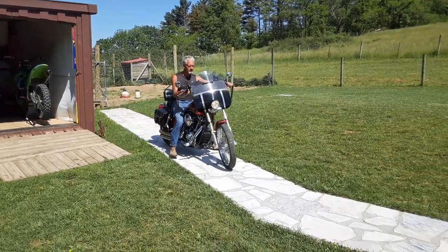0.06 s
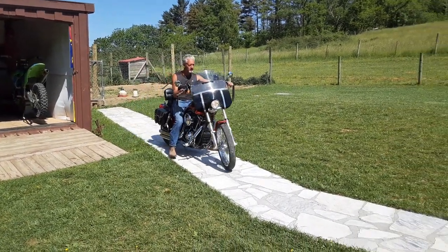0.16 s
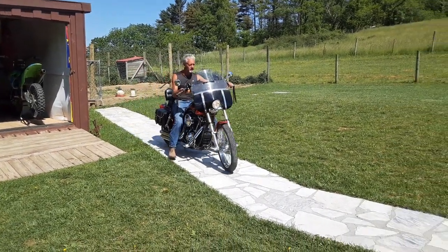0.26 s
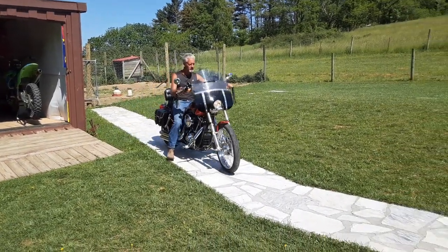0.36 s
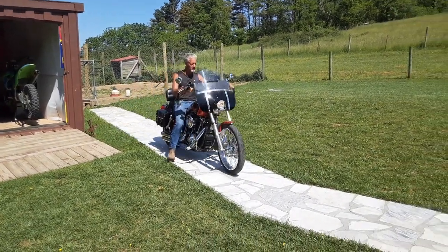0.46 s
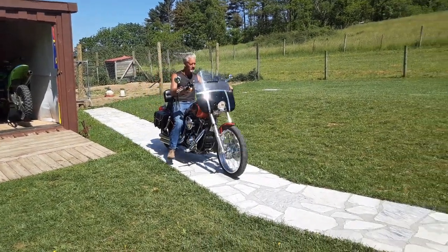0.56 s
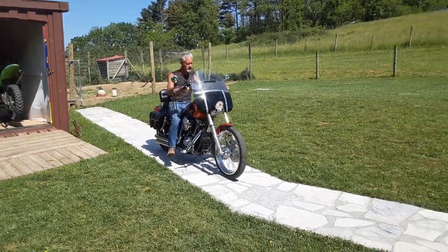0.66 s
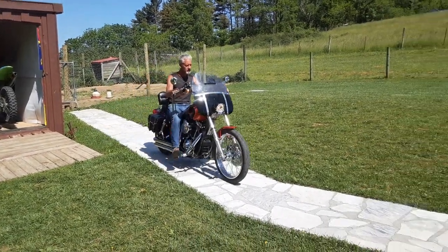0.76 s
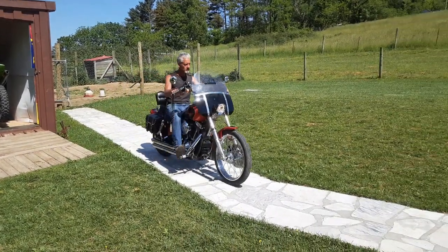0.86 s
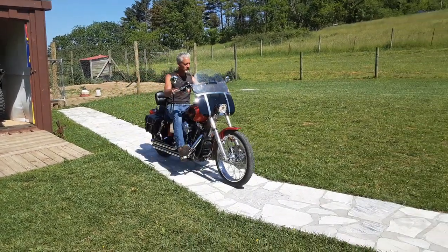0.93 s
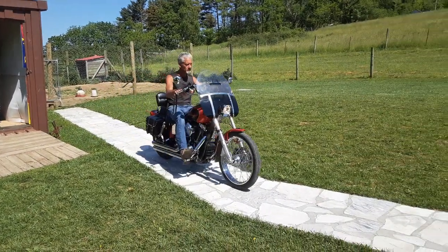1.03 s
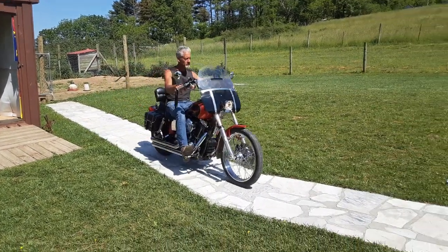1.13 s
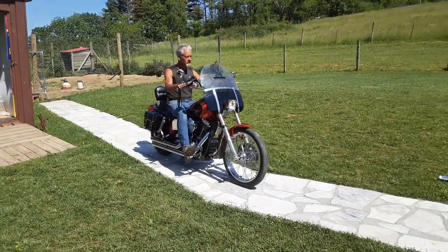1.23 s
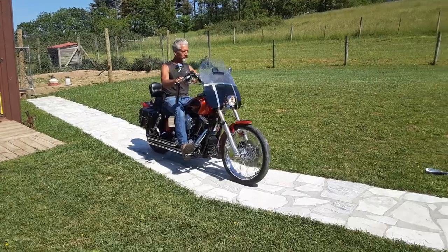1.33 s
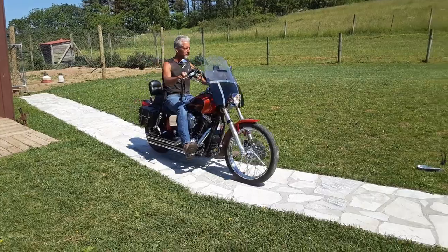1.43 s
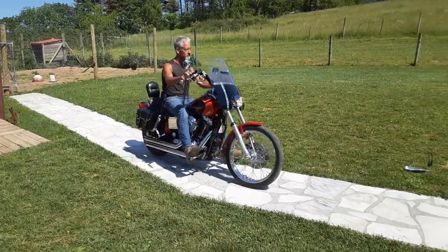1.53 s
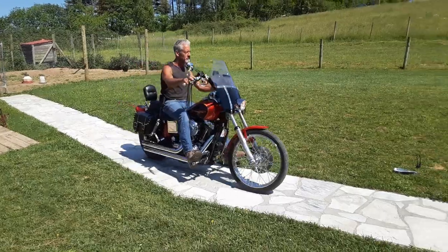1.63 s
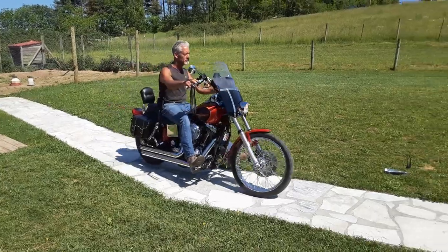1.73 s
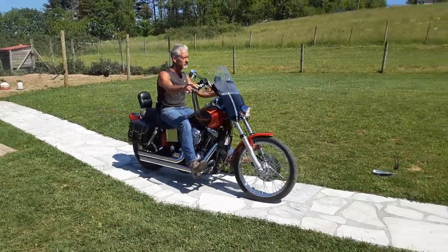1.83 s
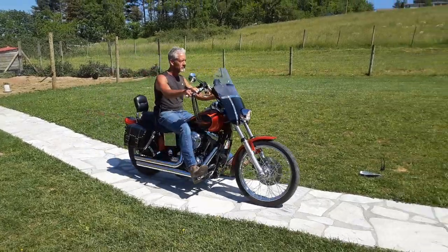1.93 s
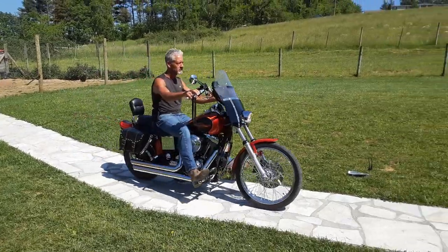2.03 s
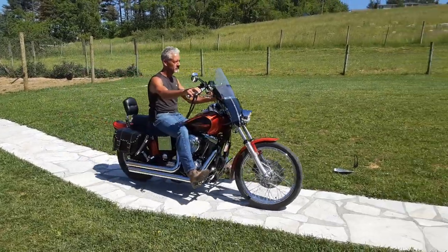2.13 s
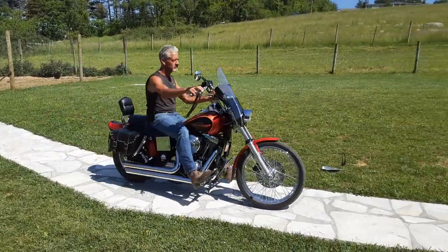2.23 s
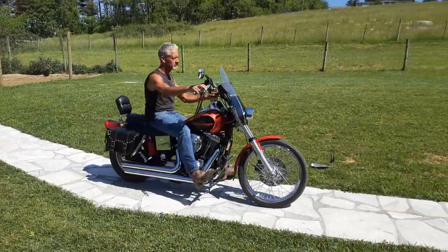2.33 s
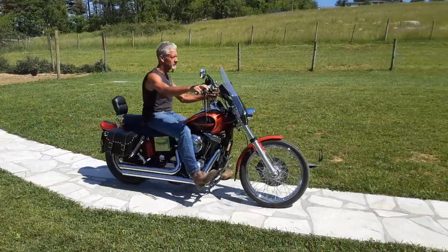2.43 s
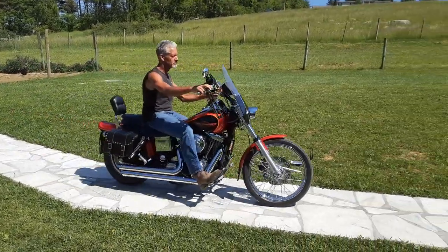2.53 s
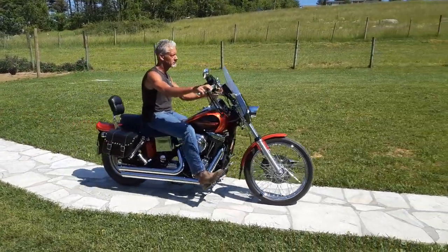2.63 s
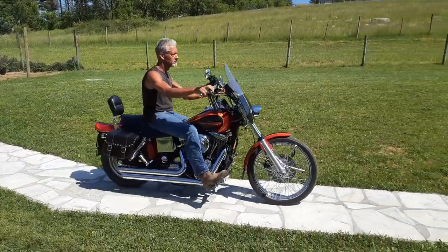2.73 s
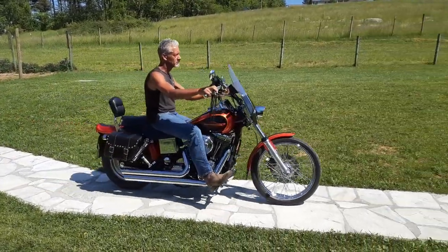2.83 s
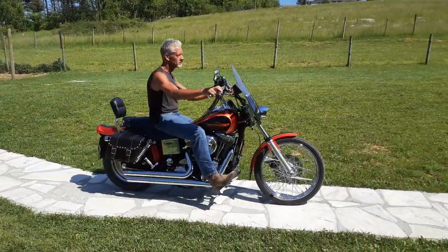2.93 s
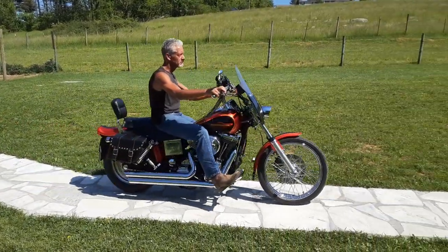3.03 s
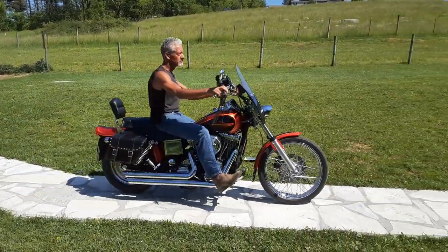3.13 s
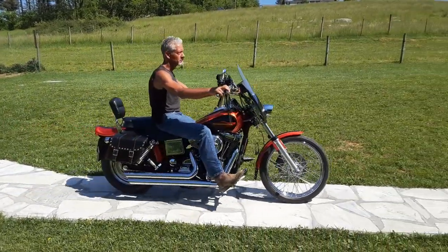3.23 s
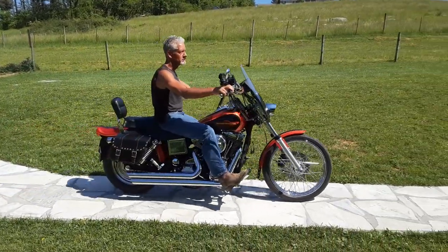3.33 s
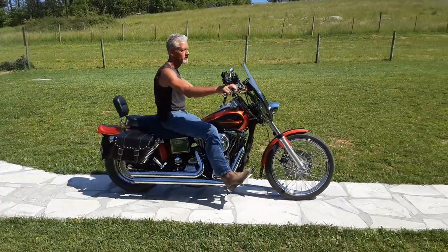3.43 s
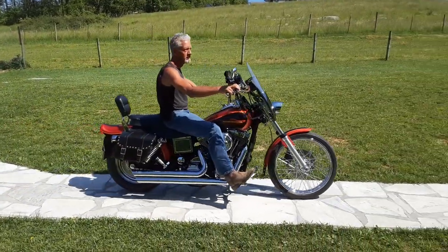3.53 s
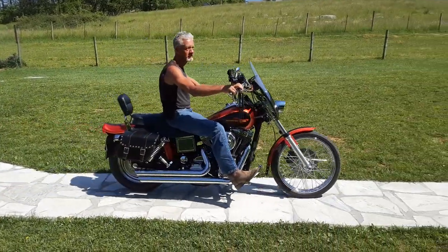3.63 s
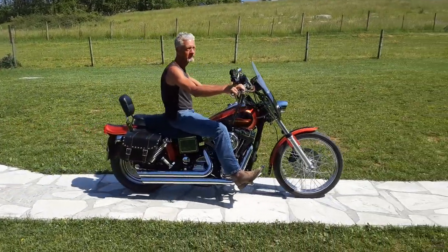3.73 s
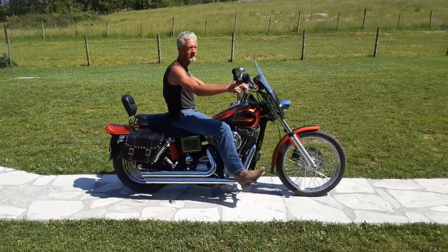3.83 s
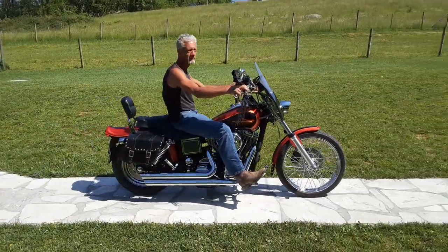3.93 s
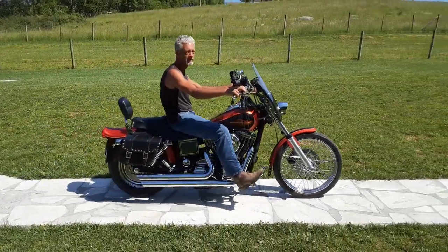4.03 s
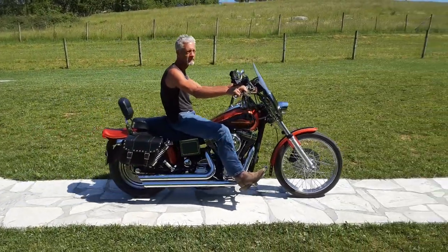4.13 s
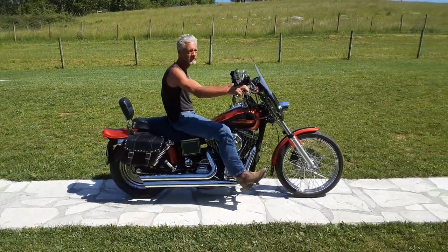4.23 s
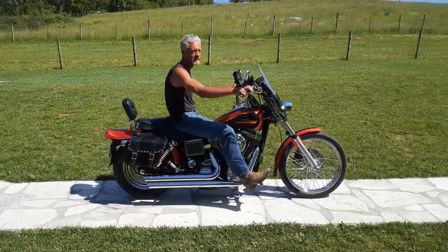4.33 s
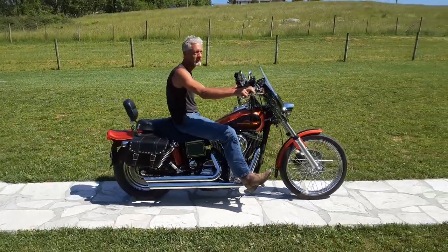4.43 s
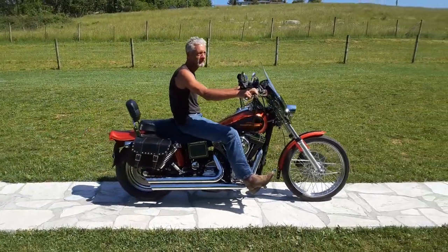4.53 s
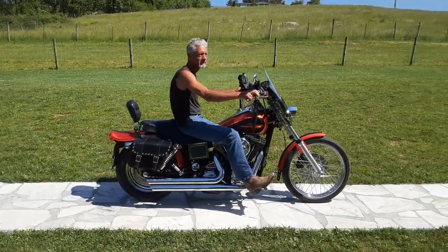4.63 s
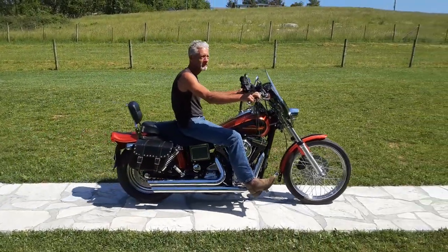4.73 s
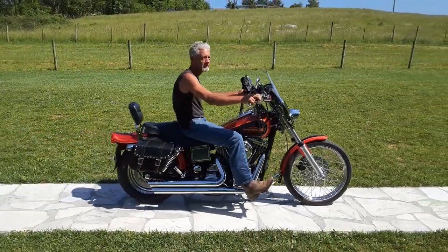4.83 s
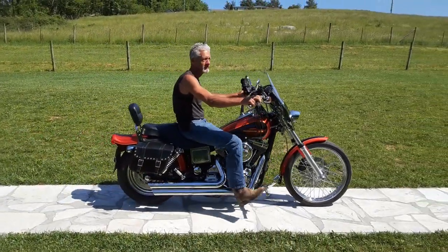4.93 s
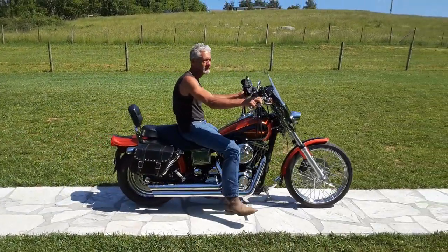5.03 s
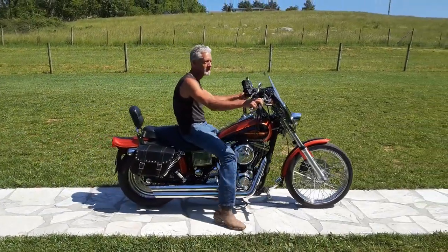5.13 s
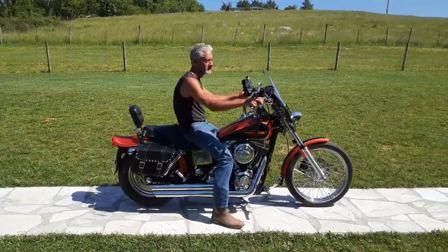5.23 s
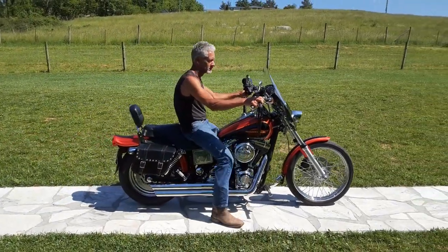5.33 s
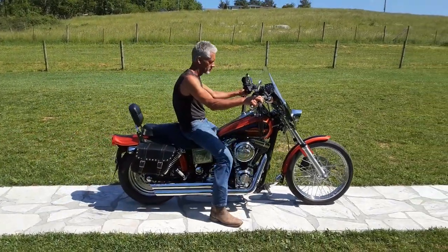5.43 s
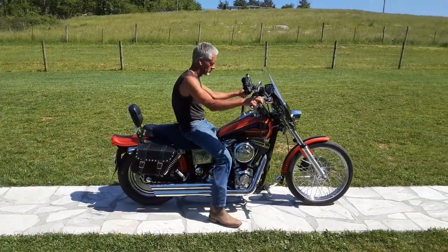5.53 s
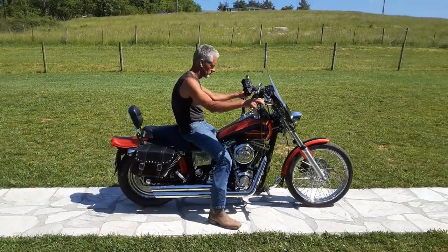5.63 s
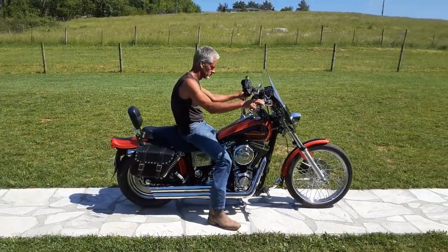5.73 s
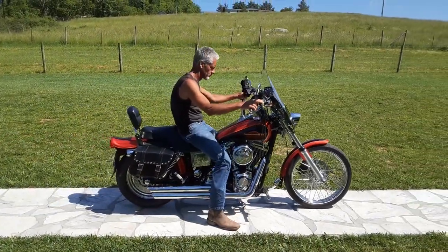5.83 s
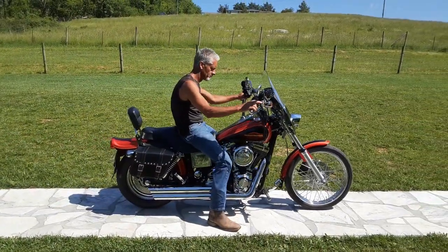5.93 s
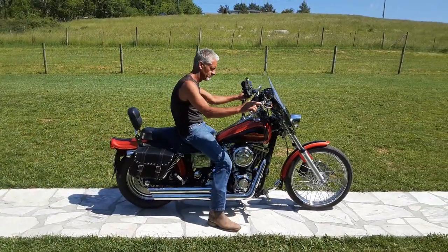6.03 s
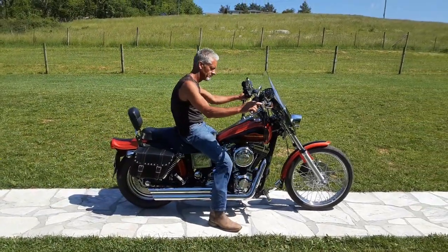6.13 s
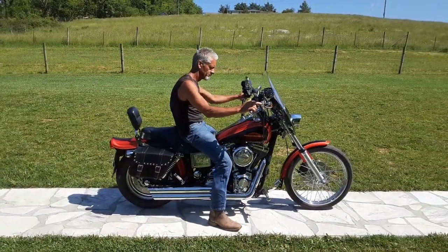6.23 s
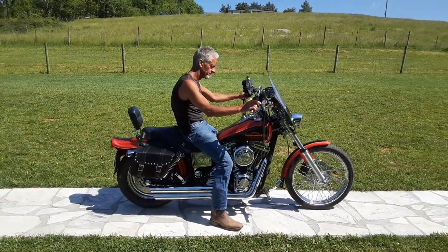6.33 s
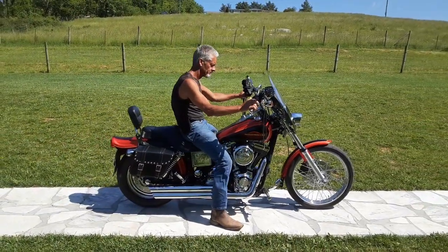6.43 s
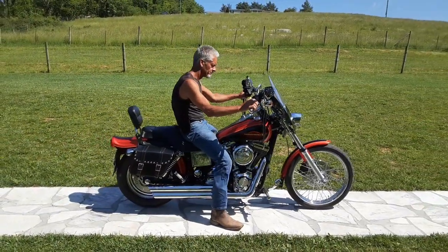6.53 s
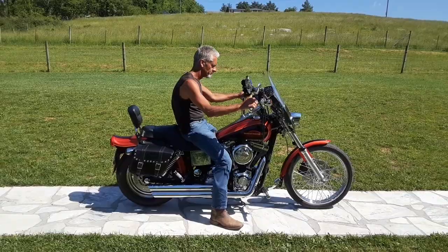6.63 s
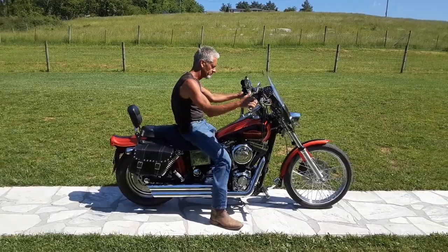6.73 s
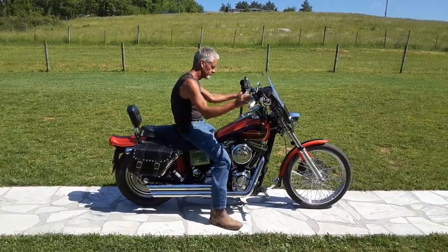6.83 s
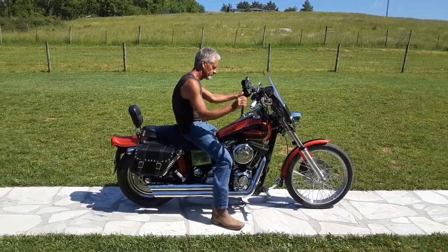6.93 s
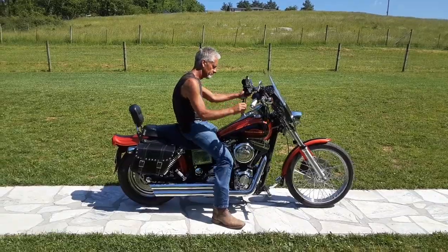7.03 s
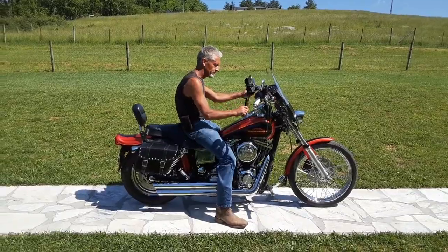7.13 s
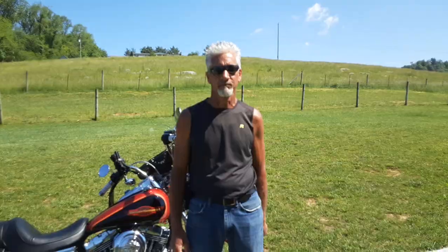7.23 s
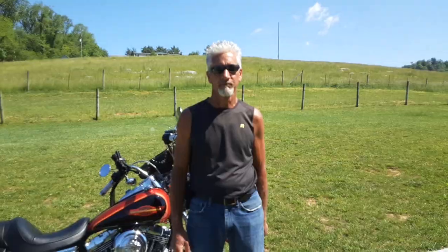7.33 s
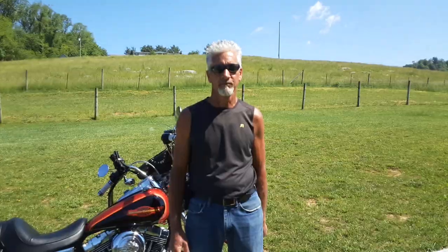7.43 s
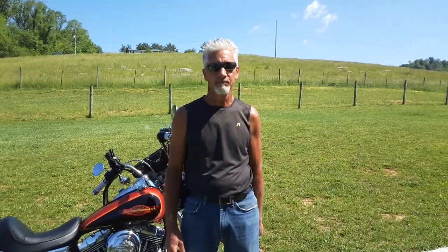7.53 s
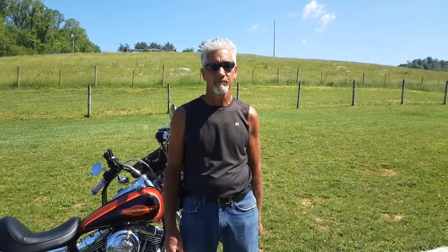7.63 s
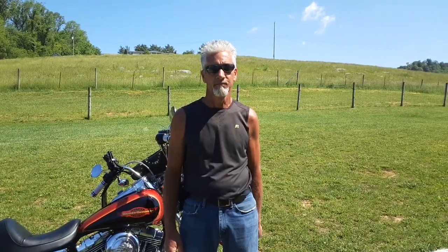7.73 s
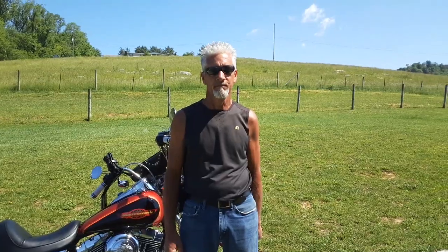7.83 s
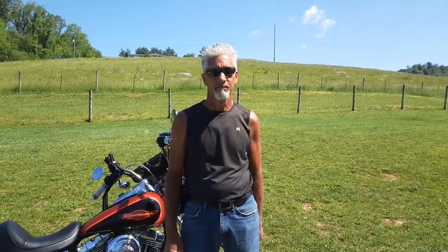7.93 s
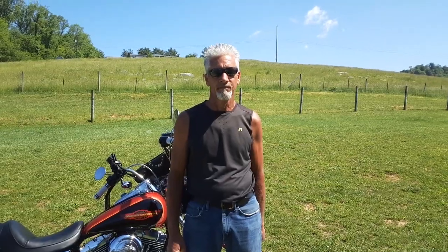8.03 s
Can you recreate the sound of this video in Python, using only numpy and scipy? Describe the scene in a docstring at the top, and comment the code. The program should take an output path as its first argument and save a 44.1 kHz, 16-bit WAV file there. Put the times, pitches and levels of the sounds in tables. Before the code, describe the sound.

A heavy motorcycle engine fills the foreground with a loping, irregular idle: low pipe thumps, crackling pops, rough breathy hiss, rumble and light mechanical clatter. The first two seconds are most ragged, with dropped beats and wall reflections; later it runs fuller and steadier. Shortly before seven seconds the firing dies away as the engine coasts down. A hard cut leaves very soft outdoor hush, small wind puffs and thin bird whistles at the stereo microphone.

```python
"""A large V-twin idles unevenly while it rolls away from a shed wall, then is switched off and coasts down.
Each firing rings its own exhaust pipe as a thump, then barks and cracks at the pipe mouth as shaped noise
and decaying modes; the wall returns the crack later and later. Filtered noise gives gas flow and clatter.
The engine stops short; the quiet lawn below it is noise hush, puffs and a faint hum, with gliding sines as birds."""
import sys
import numpy as np
from scipy import signal
from scipy.fft import rfft, irfft, next_fast_len
from scipy.io import wavfile
from scipy.ndimage import map_coordinates

SR = 44100
rng = np.random.default_rng(int(sys.argv[2]) if len(sys.argv) > 2 else 0)


def volts(x):
    """Linear amplitude factor 10**(x/20) for a level x in dB, scalar or array-like."""
    e = np.asarray(x, float) / 20
    return 10 ** e


def waveform_to_disk(signal):
    """Save audio, clipped to [-1, 1], as 16-bit WAV at the path in sys.argv[1]."""
    frames = np.transpose(np.atleast_2d(signal))
    scaled = np.clip(frames, -1, 1) * 32767
    samples = np.round(scaled).astype(np.int16)
    wavfile.write(sys.argv[1], SR, samples)


N = 355887
ENGINE_END_S = 7.243

# per cylinder: blast after firing/ms, return along the pipe after firing/ms, wall echo of crack/dB, of hiss/dB
CYLINDERS = [(-2.5, 14.06, -3.5, -0.5), (1.6, 14.69, -7.5, -2.5)]
# spectrum shape of escaping gas, also the base of the clatter: f/Hz, relative density/dB
GAS_SPECTRUM = [(590, -7), (1000, -11), (1110, -8.5), (1360, -1), (2220, -1.5), (2810, -1.5), (3050, -2.5),
                (5810, -5), (7260, -14), (9070, -5), (12500, -4.5), (15700, -16), (16500, -59)]


def unit(x):
    """Scaled to rms 1."""
    return x / np.sqrt(np.mean(x ** 2) + 1e-20)


def along(points, hz):
    """(Hz, value) points read on a log axis."""
    f, v = np.transpose(points)
    return np.interp(np.log(hz + 1), np.log(f + 1), v)


def curves(rows, s):
    """Each column after the time, read at times s."""
    at, *cols = np.transpose(rows)
    return [np.interp(s, at, c) for c in cols]


def wobble(rate_hz):
    """A smooth random curve, rate_hz knots a second."""
    knots = rng.standard_normal(int(N * rate_hz / SR) + 4)
    return map_coordinates(knots, [np.arange(N) * rate_hz / SR])


def filtered(x, response):
    """x times a complex response of frequency."""
    m = next_fast_len(x.shape[-1] + 8192)
    spectrum = rfft(x, m) * response(np.fft.rfftfreq(m, 1 / SR))
    return irfft(spectrum, m)[..., :x.shape[-1]]


def add(track, s, sound):
    """Lays a sound on the track at time s."""
    i = round(s * SR)
    part = sound[..., max(-i, 0):]
    track[..., max(i, 0):max(i, 0) + part.shape[-1]] += part


def ring(hz, t60_s, t):
    """Decaying sines, one row per mode."""
    return np.sin(2 * np.pi * np.outer(hz, t)) * volts(-60 * t / np.reshape(t60_s, (-1, 1)))


def struck(modes, t, spread_db):
    """Rows (f/Hz, level/dB, t60/s) rung at new strengths and slightly new pitches; peak 1."""
    hz, db, t60_s = np.transpose(modes)
    luck = rng.standard_normal((2, len(hz)))
    sound = volts(db + spread_db * luck[0]) @ ring(hz * (1 + 0.021 * luck[1]), t60_s, t)
    return sound / np.abs(sound).max()


def swell(t, rise_s, tail_db, tail_t60_s):
    """A burst that swells for rise_s, falls and leaves a weak tail; peak near 1."""
    u = t / rise_s
    burst = (u * np.exp(1 - u)) ** 2
    tail = (1 - np.exp(-u * u)) * volts(tail_db - 60 * t / tail_t60_s)
    return burst + tail * (1 - (t / t[-1]) ** 4)


def firings():
    """Rows (s, thump, bark, crack, hiss dB): cylinders alternate; a misfire slows the crank, enriches the next charge."""
    # idle speed as the carburettor hunts, before sag and coasting: t/s, rate/(engine cycles per s)
    speed = [(0.0, 9.32), (0.35, 10.839), (0.66, 8.516), (1.08, 10.18), (1.32, 9.873), (1.75, 9.87),
             (2.11, 10.182), (2.57, 9.524), (2.84, 9.979), (3.3, 10.097), (3.54, 9.696), (3.97, 9.592),
             (4.13, 10.331), (4.71, 9.435), (5.19, 9.938), (5.57, 9.768), (5.74, 10.049), (6.16, 9.795),
             (6.45, 9.257), (6.72, 9.236)]
    # strokes that burn badly: t/s, crank speed lost/%, thump loss/dB, gas spit loss before loss_share/dB
    misfires = [(0.107, 32.0, 8, 12), (0.172, -3.2, 21, 15), (0.382, 10.6, 21, 19), (0.712, 4.1, 13, 28),
                (1.042, 22.0, 38, 20), (1.269, 6.7, 5, 6), (1.482, 3.6, 3, 4), (1.69, 6.4, 7, 9),
                (1.9, 10.0, 33, 21), (2.111, 7.7, 9, 12), (2.935, 4.8, 5, 11), (3.748, 0.7, 3, 5),
                (4.159, 8.0, 4, 12), (5.191, 3.9, 6.5, 6), (6.31, 2.0, 4, 3), (6.526, 1.5, 1.5, 9)]
    # sound firing as the bike moves, first cylinder unless named:
    # t/s, thump of first/dB, thump of second/dB, bark/dB, crack/dB, hiss/dB
    usual_blows = [(0, -4, -1.5, -30, -27, -31), (.7, -8.5, 0, -34.5, -26.5, -31.5),
                   (.95, -3, 3, -26, -26, -30), (1.9, -2.2, 2.5, -37.5, -24, -31.5),
                   (2.3, -0.7, 2, -28, -25, -33), (3.25, 0.2, 3.5, -32, -21.5, -26),
                   (3.7, -0.1, 2.5, -32, -23, -23.5), (4.9, -0.15, 2.5, -28.5, -22, -25.5),
                   (6.7, -0.1, 3.5, -29, -20.5, -25)]
    # blows that stand out, in place of scatter: t/s, then thump, bark, crack, hiss over a usual blow/dB
    hard_blows = [(.002, 0, 11.5, 5.5, 4), (.284, 0.31, 6, 4, 2.5), (.489, 0.19, 5, 5, 4),
                  (.597, 0, -3, 0.5, -2.5), (.831, 0, 3, 3, 2), (.998, .5, -1, 2.5, 0.5),
                  (1.163, 0.38, 2.5, 4.5, 3), (1.378, 0, 1.5, 0.5, 2), (1.587, 0, 5, 4, 0),
                  (2.009, 0.24, 8.5, 5.5, 5.5), (2.217, .5, -3, 2, 4), (2.481, 0, 7, 3, -1),
                  (2.526, 0.1, 2, 3, 3), (2.734, 0, 1, 2, 3), (2.836, 1, 4, 0, 6), (3.24, 1, 9, 1, .5),
                  (3.396, 0, 2.5, -2.5, -1), (3.6, 0, -4, 3.5, 0), (3.807, 0.1, 10, 1.5, 1),
                  (3.852, 0.13, -3, 2, 1.5), (4.117, .7, 5, 0.5, 0), (4.219, 0, 0, .5, 2),
                  (4.364, .5, 7.5, 2.5, 2.5), (4.524, -0.2, 4, 2, 2.5), (4.628, 0.32, 2, 3.5, 1.5),
                  (4.777, 0, -1, -2, 3), (4.882, 0, -1, 0.5, 2), (5.147, 0, 1.5, 0, 0.5),
                  (5.295, -0.12, -5, 2.5, 0), (5.397, 0.55, 5, 2, 1), (5.557, 0.42, -4, 1, 2.5),
                  (5.602, -0.21, 1, 1.5, 1), (5.902, 0.67, 1, -0.5, -1), (6.163, 0.26, 5, 3, 3.5),
                  (6.371, 0, 4, -1.5, 1.5), (6.479, -0.22, 1, 0.5, 3.5), (6.59, -1, 5, -1, 1.5),
                  (6.636, 0, -1, -0.5, 0), (6.695, 0.31, 5, -1.5, 4)]
    # unburnt strokes per cylinder: thump drop/dB, its further fall/(dB/s), the same two for gas before loss_share
    coasting = [(7, 38, 12.6, 27), (24, 1, 14.2, 21)]
    # second cylinder over first: bark/dB, crack/dB, hiss/dB
    second_db = (1, 3, 1)
    # how far each follows the gas spit loss: bark, crack, hiss [ratio]
    loss_share = (0.98, 0.76, 0.82)
    # gain when a cylinder fires again after a miss: bark/dB, crack/dB, hiss/dB
    rich_db = (6, -0.5, 1)
    # blow-to-blow deviation: thump/dB, bark/dB, crack/dB, hiss/dB
    scatter_db = (.6, 4.5, 1.6, 2)
    first_s, key_off_s, last_s = .0015, 6.72, 7.2
    short_gap = .4305  # share of the cycle from first to second cylinder
    sag_left = .5728  # speed sag left one stroke later
    coast_hz_per_s = 16.118  # loss of cycle rate after the key is off
    match_s = .008

    rows, s, sag, missed = [], first_s, 0, [0, 0]
    luck = rng.standard_normal((200, 4)) * scatter_db
    while s < last_s:
        cyl, coast_s = len(rows) % 2, max(s - key_off_s, 0)
        near = lambda table, usual: next((row[1:] for row in table if abs(row[0] - s) < match_s), usual)
        lost_pct, thump_loss, gas_loss = near(misfires, (0, 0, 0))
        odd_db = near(hard_blows, luck[len(rows)])
        *thump_db, bark_db, crack_db, hiss_db = curves(usual_blows, s)
        if coast_s:
            drop, fall, gas_drop, gas_fall = coasting[cyl]
            thump_loss = drop + fall * coast_s
            gas_loss = gas_drop + gas_fall * coast_s
        gas_db = np.array([bark_db, crack_db, hiss_db]) + cyl * np.array(second_db)
        gas_db = gas_db + missed[cyl] * np.array(rich_db) - gas_loss * np.array(loss_share)
        rows.append([s, *(np.r_[thump_db[cyl] - thump_loss, gas_db] + odd_db)])
        missed[cyl] = gas_loss > 0
        sag = sag * sag_left + lost_pct / 100
        cycles_per_s = curves(speed, s)[0] * (1 - sag) - coast_hz_per_s * coast_s
        s += (short_gap, 1 - short_gap)[cyl] / cycles_per_s
    return rows


def thumps(blows):
    """Each blast rings its pipe, and rings it again when it has run the pipe's length and back."""
    # pipe modes: f/Hz, t60/s, signed size from the outgoing blast, signed size from its return
    first_pipe = [(77.4, 0.13, 0.022, 0.58), (104.64, 0.15, -0.59, -0.26), (157.5, 0.079, 0.53, -0.5),
                  (185.3, 0.67, -0.092, 0.134), (261, 0.17, -0.075, 0.089), (297.3, 0.12, 0.054, -0.15)]
    # the same columns: f/Hz, t60/s, signed blast size, signed return size
    second_pipe = [(81.8, 0.22, 0.18, 0.12), (124.8, 0.21, -0.15, -0.055), (169.7, 0.17, 0.024, -0.35),
                   (183.8, 0.13, -0.2, 0.14), (245, 0.12, 0.18, -0.045), (297.7, 0.23, -0.03, 0.12)]
    track, t = np.zeros(N + SR), np.arange(SR // 5) / SR
    scatter = rng.standard_normal((len(blows), 6))
    for k, (s, db, *_) in enumerate(blows):
        hz, t60_s, blast, back = np.transpose((first_pipe, second_pipe)[k % 2])
        blast_ms, back_ms = CYLINDERS[k % 2][:2]
        modes = ring(hz, t60_s, t) * volts(db + 0.3 * scatter[k, :, None])
        add(track, s + blast_ms / 1000, blast @ modes)
        add(track, s + back_ms / 1000, back @ modes)
    # a slow pressure wave: no treble
    return filtered(track[:N], lambda hz: hz ** 6 / (hz ** 6 + 44 ** 6) / np.sqrt(1 + (hz / 370) ** 14))


def cracks(blows):
    """Upper modes bark, gas spits at the pipe mouth and the wall returns it: a shared wave and two loose ones."""
    # wall echo: t/s, delay/ms, level before each cylinder's own echo level/dB
    wall = [(0, 9.2, 3.5), (.5, 10.8, 1.5), (1, 14.5, 1.5), (1.5, 16.5, 5), (2, 17.6, 6), (2.5, 21.4, 5.5),
            (3, 25.4, 0.5), (3.5, 25, 0), (4, 28, -2.5), (4.8, 27.8, -3.4), (7.3, 30.7, -3)]
    # pipe-end ringing: f/Hz, relative level/dB, t60/s
    mouth = [(1305, -4.5, 0.079), (1870, 5.5, 0.03), (2162, 4.5, 0.074), (2550, -20, 0.04),
             (3164, 14.5, 0.035), (3684, 5.5, 0.2)]
    # upper pipe modes: f/Hz, relative level (first: before hollow)/dB, t60 (all but first: 3.6 ms short)/s
    bark_table = [(522.7, -9, 0.14), (653, -5, 0.11), (721.4, 6, 0.049), (819, -6, 0.095)]
    # the lowest bark mode is strongest near the shed: t/s, gain/dB
    hollow = [(0, 6), (2, 5.5), (3, -2.5), (7.3, -3.5)]
    # the hiss brightens and dulls as the bike moves: t/s, tilt/(dB/octave)
    hiss_tilt = [(0, -.5), (1.2, 0.5), (2.5, -1.5), (3.5, 0), (4.5, 0.5), (6.7, 0), (7.3, -1)]
    # casing modes: f/Hz, relative level/dB, t60/s
    casing = [(1380, -1, 0.055), (1520, -.5, .06), (1720, -2, .04)]
    clunk_s, clunk_db = 7.021, -18.5

    track, t = np.zeros((3, N + SR)), np.arange(3072) / SR
    hz = np.fft.rfftfreq(len(t), 1 / SR)
    high = 1 / (1 + (4700 / (hz + 1)) ** 8)
    crack_shape = swell(t, 0.0044, -12, 0.56)
    hiss_shape = swell(t, 0.0031, -15.5, 0.38)
    # the wall's return swells faster than the blow and leaves a stronger, shorter tail
    echo_shape = swell(t, 0.0025, -9.5, 0.26)
    loose = [[1], [.4], [-.4]]
    for k, (s, _, bark_db, crack_db, hiss_db) in enumerate(blows):
        delay_ms, wall_db = curves(wall, s)
        # every blow has its own colour
        patch_db = 3.5 * np.interp(hz, np.linspace(0, SR / 2, 56), rng.standard_normal(56))
        gas = rfft(rng.standard_normal((3, len(t)))) * volts(along(GAS_SPECTRUM, hz) + patch_db)
        spit = 0.62 * unit(irfft(gas * (1 - high)))
        crack = volts(crack_db) * (spit + 2.63 * struck(mouth, t, 6.7) * loose)
        bright = volts(curves(hiss_tilt, s)[0] * np.log2((hz + 1) / 8000))
        hiss = volts(hiss_db) * unit(irfft(gas * high * bright))
        # the outflow sputters
        ragged = volts(3.1 * np.interp(t, np.linspace(.006, t[-1], 20), np.r_[0, rng.standard_normal(19)]))
        bark_modes = np.array(bark_table, float)
        bark_modes[0, 1] += curves(hollow, s)[0]
        bark_modes[1:, 2] += 0.0036
        bark = volts(bark_db + 10) * (1 - np.exp(-t / 0.002)) * struck(bark_modes, t, 2.7) * loose
        add(track, s - .003, bark)
        add(track, s - .0015, crack_shape * ragged * crack)
        add(track, s - .0003, hiss_shape * hiss)
        crack_echo_db, hiss_echo_db = CYLINDERS[k % 2][2:]
        returned = volts(crack_echo_db) * crack + volts(hiss_echo_db) * hiss
        add(track, s - .0008 + delay_ms / 1000, volts(wall_db) * echo_shape * returned)
    # the drive takes up its slack as the crank slows
    add(track, clunk_s, volts(clunk_db) * (1 - np.exp(-t / 0.0018)) * struck(casing, t, 1.5) * loose)
    return track[:, :N]


def running():
    """Gas rumbles, hums and growls in the pipes; valve gear and chain clatter above: filtered, wavering noise."""
    # levels before waver and trims: t/s, rumble/dB, pipe hum/dB, growl/dB, clatter/dB
    flow_levels = [(0, -24.5, -25, -37, -39.5), (.6, -30, -25.5, -38, -39.5), (2, -23.5, -32, -34, -37),
                   (3, -27.5, -34, -35, -37), (4.5, -28.5, -36, -35.5, -38.5), (6.65, -27, -36, -35, -39),
                   (6.78, -31.5, -18.5, -35.5, -36.5), (6.95, -38, -20, -46.5, -42),
                   (7.1, -44, -25, -51, -50), (7.24, -56, -29, -60, -49)]
    # spectrum shape: f/Hz, relative density/dB
    rumble_spectrum = [(25, -51), (48, 1), (70, -21.5), (150, -3), (300, -2.5), (350, -5.5), (430, -44)]
    # spectrum shape: f/Hz, relative density/dB
    growl_spectrum = [(330, -55), (400, -2.5), (460, -8.5), (520, 2), (600, -6), (720, 0), (860, -11),
                      (1050, -17), (1200, -50)]
    rumble_db, hum_db, growl_db, clatter_db = curves(flow_levels, np.arange(N) / SR)

    def noise(response):
        return unit(filtered(rng.standard_normal(N), response))

    def pipe(f):
        # resonances: centre/Hz, width/Hz, gain before squaring/dB
        modes = [(78.4, 26.4, 3.5), (147, 16.6, -5), (252, 11, -17)]
        return sum(volts(db) * 1j * f * w / (c * c - f * f + 1j * f * w) for c, w, db in modes)

    steady_db = 1.5 * wobble(20.5) - 3
    rumble = volts(rumble_db + steady_db) * noise(lambda f: volts(along(rumble_spectrum, f)))
    hum = volts(hum_db + 2.8 * wobble(13)) * noise(lambda f: pipe(f) ** 2)
    sway_db = 1.5 * wobble(30) - 1.5
    growl = volts(growl_db + sway_db) * noise(lambda f: volts(along(growl_spectrum, f)))
    unrest_db = 2.5 * wobble(45) + 1.2 * wobble(12) - 3.5
    dulled = lambda f: volts(along(GAS_SPECTRUM, f) - 6.5 * np.log2(1 + f / 4000))
    clatter = volts(clatter_db + unrest_db) * noise(dulled)
    flow = rumble + hum + growl + clatter
    return np.array([flow, np.roll(flow, 900), np.roll(flow, -1300)])  # the loose parts come by other paths


def ports(common, loose):
    """Two microphone ports: a shared wave with a phase lead, plus a part of each port's own."""
    # phase by which the left port leads: f/Hz, lead/rad
    lead = [(20, .01), (300, 0.2), (700, 0.68), (1210, 1.47), (2240, 1.96), (4910, 2.66), (8700, 13.96),
            (11900, 30.26), (16500, 25)]
    # left over right: f/Hz, level/dB
    left_tilt = [(60, 1.5), (200, 0.5), (400, 0.5), (1290, -1), (2380, 4), (4400, 5), (8120, 4), (11500, 0),
                 (14000, 5)]
    # power unrelated between ports: f/Hz, share
    diffuse = [(100, 0.032), (400, 0.21), (800, 0.047), (2000, 0.31), (5000, 0.9), (15000, 0.63)]
    side = np.array([[.5], [-.5]])
    share = lambda hz: np.clip(along(diffuse, hz), 0, 1)
    tilt = lambda hz: volts(side * along(left_tilt, hz))
    phase = lambda hz: np.exp(1j * side * along(lead, hz))
    shared = filtered(common, lambda hz: tilt(hz) * np.sqrt(1 - share(hz)) * phase(hz))
    return shared + filtered(loose, lambda hz: tilt(hz) * np.sqrt(share(hz)))


def lawn():
    """Far hush of leaves, low puffs of air on the ports and a faint far hum: noise bands and wavering sines."""
    # hush spectrum shape: f/Hz, relative density/dB
    hush_spectrum = [(18, -36), (30, -11), (179, 1.5), (355, -5.5), (569, -13.5), (2230, -12.5),
                     (3400, -17), (4650, -15.5), (7870, -29), (9710, -22.5), (16000, -26)]
    # left-right likeness: f/Hz, correlation
    alike = [(60, 0.404), (380, 0.39), (2380, -0.25), (15000, 0.11)]
    # puffs on the ports: t/s, peak/dB, rise and fall/(dB/s)
    puff_table = [(7.255, -58, 700), (7.484, -50, 197), (7.86, -49, 370)]
    # hum, before its waver: f/Hz, rms level/dB
    hum_table = [(355.3, -73), (414.5, -77), (532.9, -82)]
    t, still_db = np.arange(N) / SR, -75  # still_db: air between the puffs
    turn = lambda hz: np.arccos(np.clip(along(alike, hz), -1, 1)) / 2
    split = lambda hz: volts(along(hush_spectrum, hz)) * np.array([np.cos(turn(hz)), np.sin(turn(hz))])
    mid, side = filtered(rng.standard_normal((2, N)), split)
    hush = volts(-56.5) * unit(np.array([mid + side, mid - side]))
    puffs = unit(filtered(rng.standard_normal((2, N)), lambda hz: 1 / (1 + ((hz - 80) / 25) ** 2)))
    air = volts(still_db) + sum(volts(db - slope * np.abs(t - s)) for s, db, slope in puff_table)
    drone = sum(np.sqrt(2) * volts(db + 2.3 * wobble(6)) * np.sin(2 * np.pi * hz * t) for hz, db in hum_table)
    return hush + air * puffs + drone


def birds():
    """Thin whistles: gliding sines with soft ends, the later ones wavering in pitch; level flutters per port."""
    # notes, each an arc: t/s, length/s, share before the turn, start f/Hz, turn f/Hz, end f/Hz,
    # level before soft ends and flutter/dB
    notes = [(6.98, 0.045, 0.28, 3280, 3160, 3100, -56), (7.148, 0.1, .5, 3180, 3200, 3200, -51),
             (7.237, .045, .5, 2550, 2590, 2620, -64), (7.385, 0.064, .7, 4100, 4630, 4900, -59),
             (7.435, .04, .4, 4900, 5400, 4300, -60), (7.463, 0.13, 0.59, 2156, 2400, 2100, -64),
             (7.745, .035, .5, 2800, 2550, 2250, -65), (7.78, 0.088, .4, 2350, 2450, 2050, -63),
             (7.81, .03, .4, 2650, 2720, 2600, -65), (7.965, .065, .5, 4550, 4400, 3750, -68),
             (8.005, .02, .5, 3300, 3250, 3200, -70)]
    waver_depth = .014
    track, waver = np.zeros(N + SR), wobble(90)
    for s, length_s, turn_at, start_hz, turn_hz, end_hz, db in notes:
        t = np.arange(0, length_s, 1 / SR)
        hz = np.interp(t / length_s, [0, turn_at, 1], [start_hz, turn_hz, end_hz])
        if s > ENGINE_END_S + .1:
            hz = hz * (1 + waver_depth * waver[round(s * SR):][:len(t)])
        whistle = np.sin(2 * np.pi * np.cumsum(hz) / SR)
        add(track, s, np.sqrt(2) * volts(db) * signal.windows.tukey(len(t), .4) * whistle)
    return track[:N] * volts(3.4 * np.array([wobble(65), wobble(60)]))


def scene():
    """The engine, closed by a 1 ms fade at its end time; lawn and birds run on unfaded."""
    blows = firings()
    parts = cracks(blows) + running()
    engine = ports(parts[0] + thumps(blows), parts[1:])
    gate = np.clip((ENGINE_END_S - np.arange(N) / SR) / 0.00099, 0, 1)
    return engine * gate + lawn() + birds()


def band_limit(x):
    """A steep low-pass at the top of the band."""
    return signal.sosfilt(signal.butter(12, 16970, fs=SR, output="sos"), x)


def record(dry):
    """Peaks round off near full scale."""
    rounded = dry / (1 + np.abs(dry / 1.03) ** 8) ** (1 / 8)
    return band_limit(rounded)


dry = scene()
out = record(dry)
waveform_to_disk(out)
```